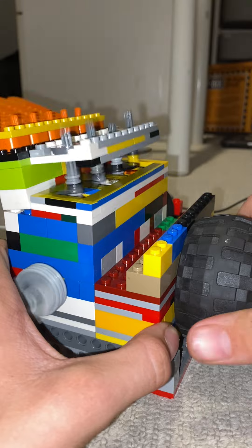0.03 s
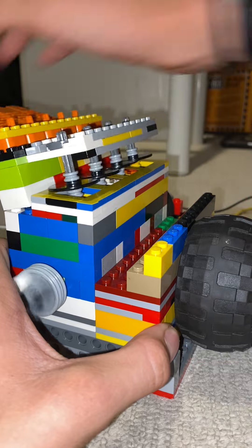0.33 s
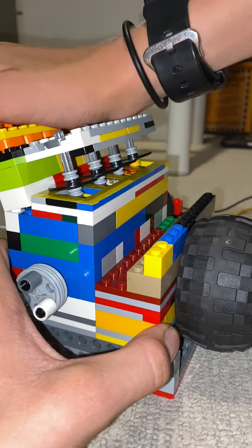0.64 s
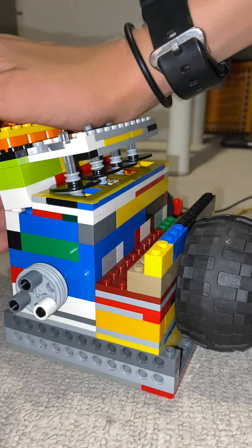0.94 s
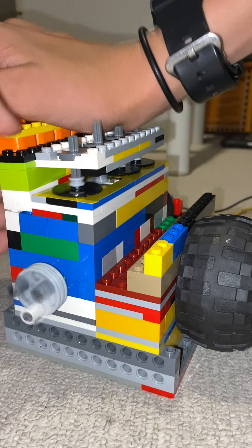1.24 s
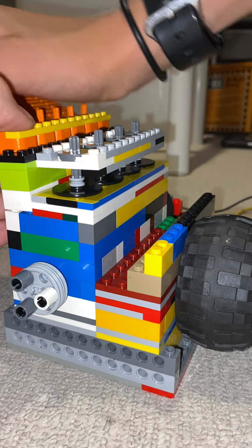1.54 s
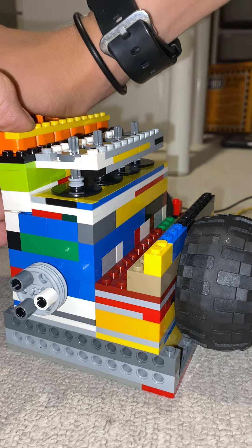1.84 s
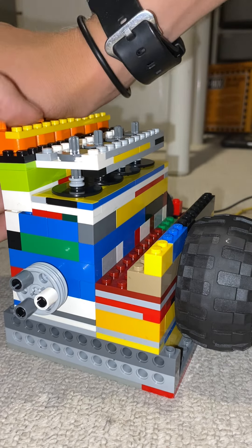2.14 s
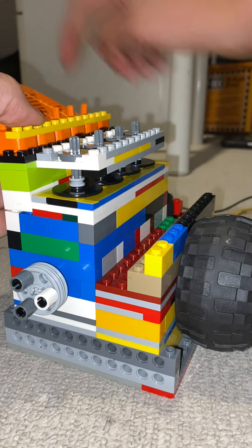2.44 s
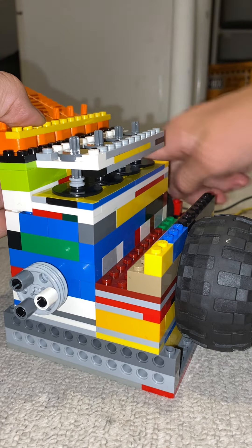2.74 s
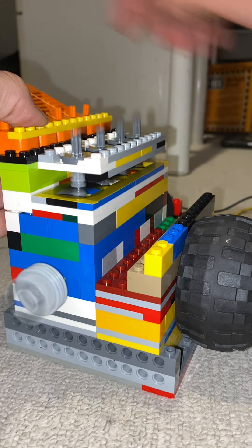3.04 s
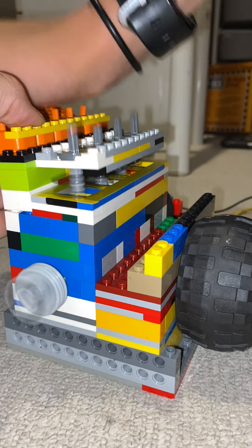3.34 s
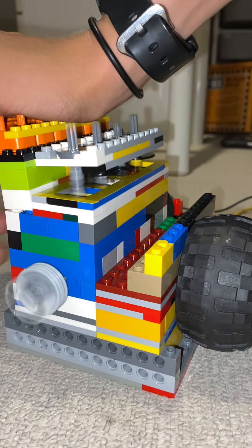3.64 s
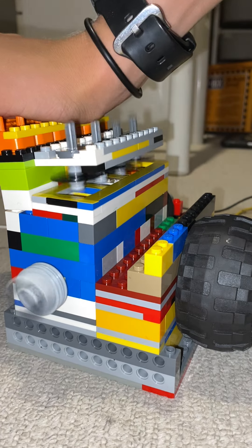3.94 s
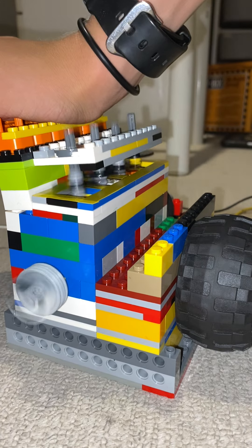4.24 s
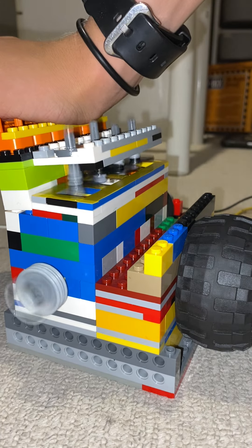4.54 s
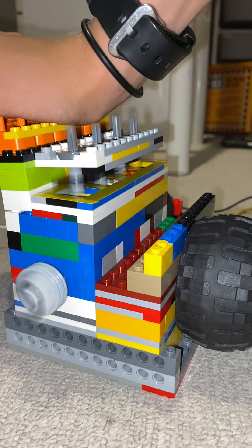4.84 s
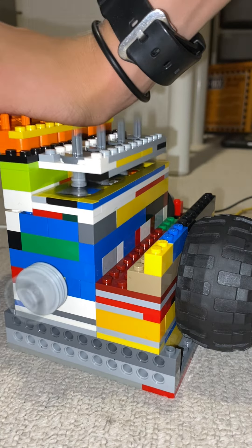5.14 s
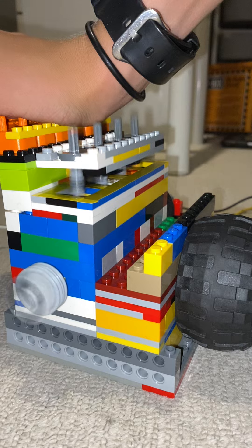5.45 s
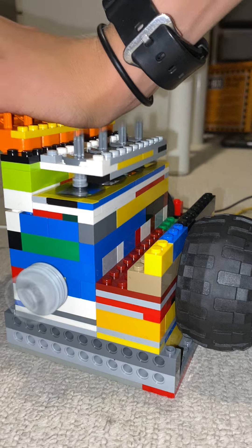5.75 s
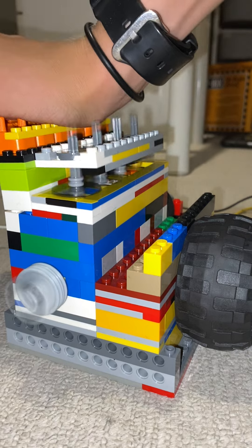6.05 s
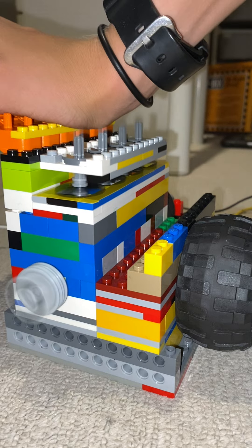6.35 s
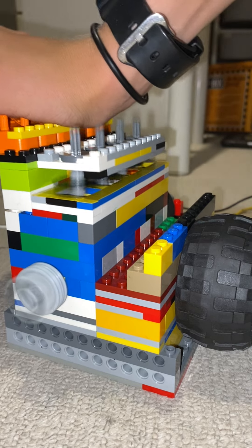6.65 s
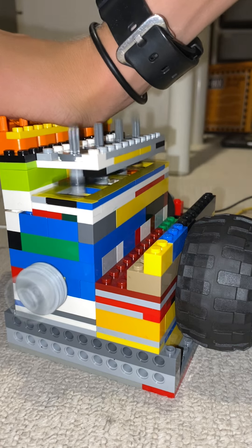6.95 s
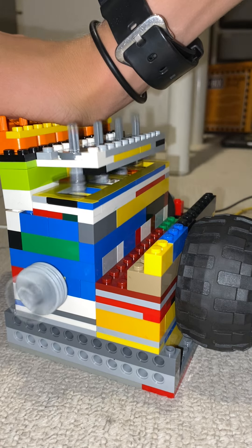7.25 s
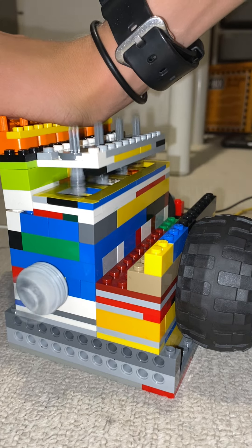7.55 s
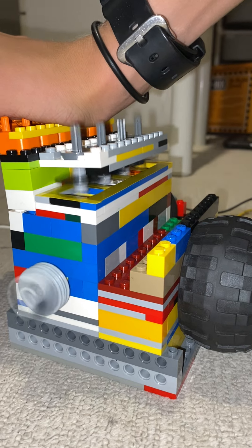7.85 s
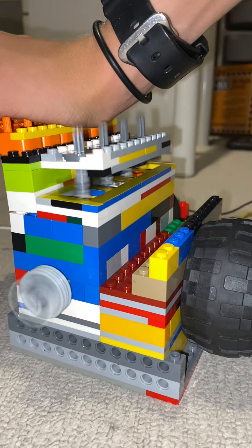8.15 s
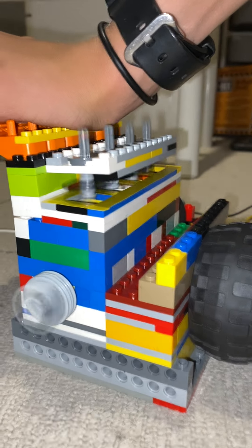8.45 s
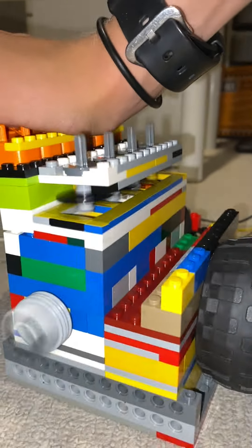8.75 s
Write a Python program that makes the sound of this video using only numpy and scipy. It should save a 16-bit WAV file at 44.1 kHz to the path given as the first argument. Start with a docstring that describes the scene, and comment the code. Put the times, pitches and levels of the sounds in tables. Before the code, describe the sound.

Over a vacuum cleaner's airflow, a toy-brick engine stalls, hisses and clicks, then restarts with rapid plastic clatter and buzzing revs.

```python
"""A plastic clatter slows to a halt: a four-cylinder toy-brick engine on a carpet, sucked round by a
vacuum cleaner. Air hisses through the stalled block; it is turned by hand, restarts, and revs five
times as a palm closes the air inlet. Pistons knock in the block, valves clack and ping, and each
stroke gulps air. Further off, the cleaner's airflow rushes and its motor whines."""
import sys
import numpy as np
from scipy import signal
from scipy.fft import rfft, irfft
from scipy.io import wavfile
from scipy.ndimage import uniform_filter1d

SR = 44100
rng = np.random.default_rng(int(sys.argv[2]) if len(sys.argv) > 2 else 0)


def transcribe(signal):
    """Save signal, clipped to [-1, 1], as a 16-bit WAV file at the path in sys.argv[1]."""
    frames = np.atleast_2d(signal).T
    limited = np.clip(frames, -1, 1)
    pcm = np.round(limited * 32767).astype(np.int16)
    wavfile.write(sys.argv[1], SR, pcm)


N = 396459
TIME = np.arange(N) / SR
BIN_HZ = np.fft.rfftfreq(N, 1 / SR)


def amp(db):
    """Decibels to gain."""
    return 10 ** (np.asarray(db) / 20)


def curves(rows, **ends):
    """One automation curve for each column after the time column."""
    times, *columns = np.transpose(rows)
    return [np.interp(TIME, times, column, **ends) for column in columns]


def at_hz(points, hz):
    """A table's value along a log frequency axis."""
    freqs, values = np.transpose(points)
    return np.interp(np.log(hz + 1), np.log(freqs + 1), values)


def unit(x):
    """Scales to rms 1."""
    return x / np.sqrt(np.mean(x ** 2) + 1e-20)


def steady(x, size=3000):
    """Rides the gain toward a running rms of 1."""
    power = uniform_filter1d(uniform_filter1d(x ** 2, size), size)
    return x / np.sqrt(abs(power) + 1e-3 * np.mean(x ** 2))


def noise(colour):
    """Coloured noise, rms 1."""
    return unit(irfft(rfft(rng.standard_normal(N)) * amp(at_hz(colour, BIN_HZ)), N))


def wander(hz):
    """Random drift of rms 1, with hz turning points a second."""
    knots = np.arange(0, N / SR + 1, 1 / hz)
    return unit(np.interp(TIME, knots, rng.standard_normal(len(knots))))


def clicks(times, gains):
    """Impulses at times in seconds."""
    return np.bincount(np.clip(np.round(times * SR).astype(int), 0, N - 1), gains, N)


def resonate(x, hz, t60):
    """Rings one decaying mode of unit energy."""
    t = TIME[:2048]
    mode = amp(-60 * t / t60) * np.sin(2 * np.pi * hz * t)
    return signal.oaconvolve(x, mode / np.linalg.norm(mode))[:N]


def ring(x, colour, lag_s=0, size=8192):
    """Rings a body; bending waves bring the lows late, by lag_s at 1 kHz."""
    hz = np.fft.rfftfreq(size, 1 / SR)
    log_gain = np.log(amp(at_hz(colour, hz)))
    minimum_phase = -signal.hilbert(np.r_[log_gain, log_gain[-2:0:-1]]).imag[:len(hz)]
    bending = 4 * np.pi * lag_s * np.sqrt(1000 * hz)
    response = irfft(np.exp(log_gain + 1j * (minimum_phase - bending)))
    return signal.oaconvolve(x, response / np.linalg.norm(response))[:N]


def chatter(blows, t60, share):
    """A share of each blow's energy becomes a short shiver of loose bricks."""
    fade = amp(-120 * TIME[:4096] / t60)
    energy = signal.oaconvolve(blows ** 2, fade / fade.sum())[:N]
    shiver = np.sqrt(abs(energy)) * rng.standard_normal(N)
    return -np.sqrt(1 - share) * blows + np.sqrt(share) * shiver


# Colour of the cleaner's airflow: freq_hz, level_db
RUSH_COLOUR = [(30, -42), (60, -9), (100, -10), (170, -2.5), (300, -4), (450, -6), (600, -3), (900, -17.5),
               (1700, -17.5), (3300, -16), (6200, -7.5), (8500, -14), (12000, -7.5), (15500, -13.5)]

def cleaner_rush():
    """The bed: steady airflow through the vacuum cleaner."""
    return amp(-39) * noise(RUSH_COLOUR)


# The motor, speeding up while the air is blocked: time_s, shaft_hz, whine_db
MOTOR = [(0, 558.5, -64), (0.5, 560, -55), (1.12, 562, -39), (1.18, 563, -58), (1.42, 570, -44.5),
         (1.58, 572, -44), (1.63, 573, -52), (1.8, 576.3, -45.5), (2.35, 580.3, -40), (2.42, 580, -52),
         (2.48, 579.3, -45), (2.54, 579, -55), (2.7, 579, -45), (3.0, 579, -41), (3.5, 575, -50),
         (4.3, 570.3, -44), (5.2, 566.5, -51), (8.99, 566.7, -48)]
# Mains hum partials: pitch_hz, level_db
MAINS = [(100, -51.5), (300, -63.5)]
FAN_BLADES = 9
BLOCKED_FROM_S, BLOCKED_TO_S = 1.26, 3.54

def cleaner_motor():
    """Fan blades whine over mains hum; the shaft hums louder while the air is blocked."""
    shaft_hz, whine_db = curves(MOTOR)
    blocked = np.clip(np.minimum(TIME - BLOCKED_FROM_S, BLOCKED_TO_S - TIME) / 0.3, 0, 1)
    shaft = 2 * np.pi * np.cumsum(shaft_hz * (1 + 0.0003 * wander(40.2))) / SR
    blades = np.sin(FAN_BLADES * shaft) + amp(-9) * np.sin(2 * FAN_BLADES * shaft)
    whine = amp(whine_db + 2 * wander(24.57)) * blades
    hum = amp(-59 + 12 * blocked + wander(24.6)) * np.sin(shaft)
    mains = sum(amp(db + 0.82 * wander(33)) * np.sin(2 * np.pi * hz * TIME) for hz, db in MAINS)
    return np.sqrt(2) * (whine + hum + mains)


# Fader for the air leaking through the valves: time_s, gain_db
LEAK_FADER = [(0.05, -31), (0.4, -32), (1.12, -30.5), (1.18, -35.5), (1.45, -38.5), (1.58, -47.5),
              (2.85, -43.5), (3.05, -32), (8.99, -38.5)]
# Colour of its hiss: freq_hz, level_db
HISS_COLOUR = [(100, -40), (300, -26), (520, -28), (660, -12), (1100, -4.5), (1500, -8.5), (1850, -13),
               (2250, -15), (2950, -11), (3750, -14), (4400, -9.5), (5000, -6.5), (5500, -13), (6300, -0.5),
               (7500, -18.5), (11000, -4.5), (15500, -10)]
# Cavities that sing in it: pitch_hz, level_db, t60_s
CAVITIES = [(652, -1, 0.022), (1110, -7, 0.016), (1490, -3.5, 0.014), (2230, 2, 0.0058), (3460, -6, 0.0098),
            (4230, 1, 0.0087)]

def air_leak():
    """Air hisses through the gaps and sounds the small cavities of the block."""
    hollow = unit(sum(amp(db) * resonate(rng.standard_normal(N), hz, t60) for hz, db, t60 in CAVITIES))
    gain = amp(curves(LEAK_FADER)[0] + 1.66 * wander(60))
    return gain * (amp(-1.5) * noise(HISS_COLOUR) + amp(-4.5) * hollow)


# Air at a valve of the halted engine: time_s, centre_hz, level_db
WHIRR = [(0.3, 4300, -90), (0.46, 4400, -49), (0.75, 4400, -58), (1.13, 4620, -37), (1.19, 4700, -90)]

def valve_whirr():
    """Air scrapes past a half-shut valve: a fluttering band that builds, rises and breaks off."""
    centre_hz, level_db = curves(WHIRR)
    band = signal.sosfilt(signal.butter(2, 375, fs=SR, output="sos"), rng.standard_normal(N))
    carrier = np.cos(2 * np.pi * np.cumsum(centre_hz) / SR)
    return amp(level_db + 1.4 * wander(130)) * unit(band * carrier)


# Partials of the air pulses: cycles_per_turn, level_db
CRANK_ORDERS = [(1, -22), (2, -10), (3, -13), (4, 0), (5, -13), (6, -19), (8, -15)]
# The pulses come and go as the valves seal well or badly: time_s, gain_db
GULP_FADER = [(0.06, -28), (0.17, -45), (0.28, -40), (0.42, -51), (2.95, -48), (3.1, -23), (3.2, -28),
              (3.42, -30), (3.6, -47), (4.2, -38), (4.5, -38.5), (4.95, -38.5), (5.07, -22.5), (5.19, -23),
              (5.32, -32), (5.46, -30.5), (5.6, -30), (5.89, -26.5), (6.06, -36), (6.36, -26), (6.55, -26),
              (6.64, -30), (6.99, -25), (7.1, -35), (7.4, -32), (7.9, -35), (8.06, -41), (8.17, -33),
              (8.99, -31.5)]

def air_gulps(turns, roughness=0.33, wander_hz=70):
    """Each stroke gulps air: a rough tone at the stroke rate, with weaker crank orders for growl."""
    growl = 0
    for order, db in CRANK_ORDERS:
        gain = amp(db) * (1 + roughness * wander(wander_hz))
        phase = 2 * np.pi * (order * turns + rng.random()) + roughness * wander(wander_hz)
        growl += gain * np.sin(phase)
    return np.sqrt(2) * amp(curves(GULP_FADER)[0]) * growl


# Small hard parts that ring when a valve shuts: pitch_hz, level_db, t60_s
PINGS = [(990, -6, 0.017), (1640, -3.5, 0.0051), (2060, -1, 0.018), (2480, -9, 0.015), (3530, -5, 0.014),
         (4280, -1, 0.0075), (4440, 1.5, 0.0049), (4920, -11.5, 0.0068), (5500, -8.5, 0.0074)]

def pings(blows, spread_db=8.5):
    """Each blow lands differently and mostly rings just one or two of the small parts."""
    rings = 0
    for k, (hz, db, t60) in enumerate(PINGS):
        landing = unit(amp(spread_db * np.clip(rng.standard_normal(N), -2, 2)))
        rings += (-1) ** k * amp(db) * resonate(blows * landing, hz, t60)
    return rings / np.sqrt(len(PINGS))


# Bright colour of a valve: freq_hz, level_db
CLACK_COLOUR = [(200, -21.5), (500, -1.5), (900, -16), (1400, -14), (1800, -10.5), (2250, -2.5),
                (2850, -4.5), (4100, -2.5), (4700, -4.5), (5400, 0), (7000, -7), (8500, -8.5),
                (11500, -15.5), (15500, -16.5)]

def clack(blows):
    """Plastic strikes plastic with a hard, bright edge."""
    return ring(blows, CLACK_COLOUR)


# Dark colour of the plastic block: freq_hz, level_db
KNOCK_COLOUR = [(20, -59), (42, -10.5), (70, 0.5), (120, -2.5), (180, -0.5), (275, 2), (350, -2.5),
                (450, -3.5), (750, -7.5), (1400, -8), (2200, -19), (3000, -25.5), (4000, -27), (9000, -53)]

def knock(blows, lag_s):
    """A piston's blow bends the block and chirps downward through it."""
    return ring(blows, KNOCK_COLOUR, lag_s)


# The engine is turned by hand: start_s, end_s
HANDLING = [(1.18, 1.22), (2.92, 2.99)]

def hand_taps(per_s=36, slip_s=0.004, spread_db=2):
    """Parts tap lightly and unevenly under the hand; returns rows of start_s, knock_db, clack_db."""
    times = np.concatenate([np.arange(start, end, 1 / per_s) for start, end in HANDLING])
    late, heavy, bright = rng.standard_normal((64, 3))[:len(times)].T
    return np.c_[times + slip_s * late, -29 + spread_db * heavy, -22 + spread_db * bright]


# Hard slaps of a loose piston, ahead of each layer's gain: start_s, knock_db, clack_db
SLAPS = [(0.040, -15, -28), (1.231, -20, -28), (1.250, -28, -18), (1.266, -22, -18), (1.281, -22, -9.5),
         (1.294, -24, -12), (1.306, -13.5, -8.5), (1.328, -24, -14), (1.346, -27, -17), (1.359, -11, -9),
         (1.382, -26, -24), (1.402, -21.5, -15.5), (1.433, -29, -16), (1.456, -20, -14), (1.509, -29, -25),
         (2.894, -22.5, -15), (2.939, -20, -9.5), (2.945, -25, -16), (2.964, -25, -18), (2.990, -16, -11),
         (3.001, -11, -8), (3.012, -11, -7.5), (3.299, -22, -6), (3.474, -19, -10.5), (3.568, -21, -17),
         (3.659, -13.5, -10), (3.727, -12, -12), (3.759, -12.5, -9), (3.786, -12.5, -19),
         (3.821, -11.5, -12), (3.856, -15, -12), (3.877, -19, -13), (3.886, -10, -20), (3.911, -15, -13),
         (3.927, -14, -22), (3.946, -13, -24), (3.978, -10, -14), (4.004, -14, -11), (4.044, -16, -16),
         (4.076, -14.5, -11), (4.111, -13, -14), (4.131, -16.5, -17), (4.142, -16.5, -23),
         (4.176, -14.5, -13), (4.207, -17, -22), (4.828, -18, -26), (4.853, -17, -22), (4.877, -14, -27),
         (4.905, -14, -23), (4.936, -11.5, -18), (4.964, -10, -12), (4.996, -9, -0.5), (7.293, -26, -13),
         (7.496, -18, -26), (7.573, -19, -14), (7.601, -16.5, -15), (7.652, -17, -20), (7.703, -20, -20),
         (7.780, -19, -22), (7.831, -19, -22), (7.905, -23, -20), (7.935, -17, -30), (8.026, -17.5, -22),
         (8.242, -25, -19), (8.382, -22, -22), (8.438, -18, -20), (8.516, -22, -22), (8.675, -20, -8),
         (8.785, -15, -18), (8.882, -19, -20), (8.966, -17, -20)]
# The piston bounces back: min_delay_s, max_delay_s, gain_db
BOUNCES = [(0.002, 0.005, 9), (0.005, 0.010, 3)]
# Dull colour of the block rocking on the carpet: freq_hz, level_db
THUD_COLOUR = [(30, -25), (60, 0), (100, 0), (170, -6), (260, -10), (420, -22), (900, -45), (3000, -75)]

def piston_slaps():
    """Slaps and hand taps: a bouncing knock, a bright tick on top and a thud underneath."""
    times, knock_db, clack_db = np.r_[SLAPS, hand_taps()].T
    hits = clicks(times - 0.0014, amp(knock_db))
    bounces = sum(clicks(times + rng.uniform(soon, late, len(times)), amp(knock_db + db))
                  for soon, late, db in BOUNCES)
    ticks = clicks(times + 0.0004, amp(clack_db + 9.5))
    knocks = knock(chatter(amp(17.5) * hits + bounces, t60=0.021, share=0.087), lag_s=0.002393)
    thuds = amp(8) * ring(chatter(hits, t60=0.38, share=0.95), THUD_COLOUR)
    clacks = clack(chatter(ticks, t60=0.022, share=0.83))
    return knocks + thuds + clacks + amp(-7) * pings(ticks)


# Engine speed from the restart on, four strokes to a crank turn: time_s, strokes_per_s
SPEED = [(2.95, 71), (3.0, 89), (3.05, 174), (3.14, 223), (3.3, 198), (3.42, 202), (3.55, 142), (4.1, 118),
         (4.38, 99), (4.55, 90), (4.8, 99.5), (4.95, 121), (5.04, 155), (5.18, 240), (5.25, 224),
         (5.31, 188), (5.57, 164), (5.87, 264), (6.05, 172), (6.2, 155), (6.32, 229), (6.45, 239),
         (6.55, 257), (6.66, 209), (6.96, 256), (7.03, 226), (7.2, 194), (7.35, 174), (7.64, 156),
         (8.05, 131), (8.15, 151.5), (8.55, 148.4), (8.99, 152)]

def stroke_rate(coast_from_hz=187, friction_hz_per_s=325):
    """Strokes per second: a coast against steady friction, a standstill, then the restart."""
    coast = np.maximum(coast_from_hz - friction_hz_per_s * TIME, 0)
    return coast + curves(SPEED, left=0)[0]


# Revs, a palm on the air inlet: start_s, end_s, rise_s
REVS = [(3.006, 3.45, 0.025), (4.925, 5.262, 0.089), (5.534, 5.96, 0.15), (6.154, 6.614, 0.087),
        (6.64, 7.029, 0.077)]

def palm_suction(release_s=0.079):
    """Suction from 0 to 1: builds as the palm closes, holds, and drops quickly as it lifts."""
    return sum(np.clip(np.minimum((TIME - start) / rise_s, (end - TIME) / release_s), 0, 1)
               for start, end, rise_s in REVS)


# How hard the pistons are thrown about, beyond what their speed gives: time_s, gain_db
FORCE = [(0.06, 4.5), (0.09, -6), (0.3, -9.5), (3.0, 1), (3.025, 8.5), (3.12, 4.5), (3.2, 0), (3.39, 2),
         (3.48, -5.5), (3.61, -4), (3.75, 1), (4.15, 0.5), (4.35, 1.5), (4.75, 2.5), (4.9, 5.5),
         (5.15, 4.5), (5.35, 1), (5.75, 1), (6.05, -0.5), (6.4, 0), (7.0, -0.5), (7.4, -0.5), (7.95, -1.5),
         (8.99, 3.5)]

def stroke_levels(rate, suction, cruise_hz=150, rev_db=1):
    """Knock and clack in dB grow with force, suction and speed (the knock only up to cruising speed)."""
    force_db = curves(FORCE)[0]
    octaves = np.log2(np.maximum(rate, 1) / cruise_hz)
    knock_db = -27.5 + force_db + 15.5 * np.minimum(octaves, 0) + rev_db * suction
    clack_db = -30 + 0.83 * force_db + 7 * octaves + rev_db * suction
    return knock_db, clack_db


def strokes(turns, uneven, accents_db, play, spread_db):
    """One blow a stroke, weak or strong; axle play (a share of the stroke) makes it early or late."""
    count = np.floor(len(accents_db) * turns).astype(int)
    onsets = np.flatnonzero(np.diff(count)) + 1
    late, strong = rng.standard_normal((2048, 2))[:len(onsets)].T
    cylinder = count[onsets] % len(accents_db)
    level_db = uneven[onsets] * accents_db[cylinder] + spread_db * np.clip(strong, -2, 2)
    return clicks((onsets + play * late * np.gradient(onsets)) / SR, amp(level_db))


# Each cylinder's accent, in firing order: knock_db, clack_db
CYLINDERS = [(6, 1.5), (2, -0.5), (1, -1), (-4.5, -0.5)]
# Colour of pistons snapping against their stops under suction: freq_hz, level_db
SNAP_COLOUR = [(250, -12.5), (600, 3), (1500, 1), (2200, 1.5), (2900, -8), (4100, -1), (5400, -2),
               (7000, -11), (15500, -14.5)]

def engine():
    """Piston knocks and snaps, valve clacks and pings, and gulps of air, all locked to the crank."""
    rate, suction = stroke_rate(), palm_suction()
    turns = np.cumsum(rate * (1 + 0.008 * wander(30))) / SR / len(CYLINDERS)
    knock_db, clack_db = stroke_levels(rate, suction)
    knock_accents, clack_accents = np.transpose(CYLINDERS)
    uneven = 1 - 0.8 * suction  # suction evens out the cylinders
    pistons = strokes(turns, uneven, knock_accents, play=0.28, spread_db=2)
    valves = strokes(turns, uneven, clack_accents, play=0.04, spread_db=1.5)
    loose_valves = strokes(turns, uneven, clack_accents, play=0.5, spread_db=2.5)
    knocks = amp(knock_db) * steady(chatter(pistons, t60=0.022, share=0.12))
    snaps = suction * amp(clack_db + 1.5) * steady(chatter(valves, t60=0.005, share=0.35))
    clacks = amp(clack_db) * steady(chatter(valves + amp(-3) * loose_valves, t60=0.026, share=0.96))
    taps = amp(clack_db - 2) * steady(valves + amp(-1) * loose_valves)
    clatter = knock(knocks, lag_s=0.002058) + clack(clacks) + ring(snaps, SNAP_COLOUR) + pings(taps)
    return clatter + air_gulps(turns) * np.minimum(rate / 50, 1)


# Sound thrown back by nearby things: freq_hz, gain_db
SCATTER = [(100, -26), (300, -9.5), (800, -17), (1600, -16), (3000, -7), (5000, -8), (7400, -27),
           (10000, -8.5), (13500, -7), (16000, -4)]

def reflections(x, t60, size=4096, count=6):
    """Short stereo reflections from hands and furniture, shifting as parts and hands move."""
    tails = rng.standard_normal((count, 2, size)) * amp(-60 * TIME[:size] / t60)
    tails /= np.linalg.norm(tails, axis=2, keepdims=True)
    sends = np.array([wander(25) for _ in tails])
    sends /= np.linalg.norm(sends, axis=0)
    echoes = sum(signal.oaconvolve((x * send)[None], tail, axes=1)[:, :N]
                 for send, tail in zip(sends, tails))
    return irfft(rfft(echoes) * amp(at_hz(SCATTER, BIN_HZ)), N)


def scene():
    """Engine and cleaner in a dead, carpeted room."""
    direct = engine() + piston_slaps() + air_leak() + valve_whirr() + cleaner_rush()
    return amp(-0.12) * (direct + reflections(direct, t60=0.04) + cleaner_motor())


# Phase between the two microphone ports: freq_hz, left_lead_rad
PORT_PHASE = [(100, -0.06), (380, -0.1), (600, -0.6), (720, -1.25), (810, -2.2), (880, -4.7), (1200, -5.45),
              (1400, -6.2), (2050, -6.2), (2800, -4.9), (3300, -5.55), (4400, -5.6), (4850, -6.25),
              (5500, -5.35), (7000, -3.2), (8300, -2.4), (9700, -0.2), (11300, 0.7), (13100, 2.9),
              (15800, 5.6)]
# Balance between them: freq_hz, left_minus_right_db
PORT_BALANCE = [(60, 0), (160, -0.6), (270, -2), (450, 0), (640, -6), (840, -15), (960, -4.5), (1220, 1),
                (2000, -0.5), (3300, -1), (15000, 0)]
START_S, LOW_CUT_HZ, HIGH_CUT_HZ = 0.035, 63, 15950

def record(dry):
    """Two microphone ports differ in phase and level; then a low cut, a peak ceiling and a high cut."""
    sides = np.array([[1], [-1]])
    balance = amp(sides * at_hz(PORT_BALANCE, BIN_HZ) / 2)
    phase = np.exp(0.5j * sides * at_hz(PORT_PHASE, BIN_HZ))
    heard = irfft(rfft(dry) * balance * phase, N) * (TIME > START_S)
    heard = signal.sosfilt(signal.butter(2, LOW_CUT_HZ, "high", fs=SR, output="sos"), heard)
    heard = np.clip(heard, -0.85, 0.85)
    high_cut = signal.firwin(511, HIGH_CUT_HZ, window=("kaiser", 9), fs=SR)
    return signal.oaconvolve(heard, high_cut[None], "same")


dry = scene()
out = record(dry)
transcribe(out)
```